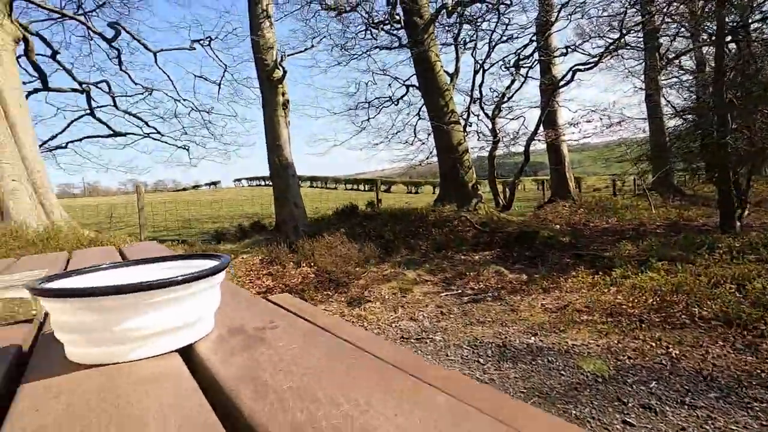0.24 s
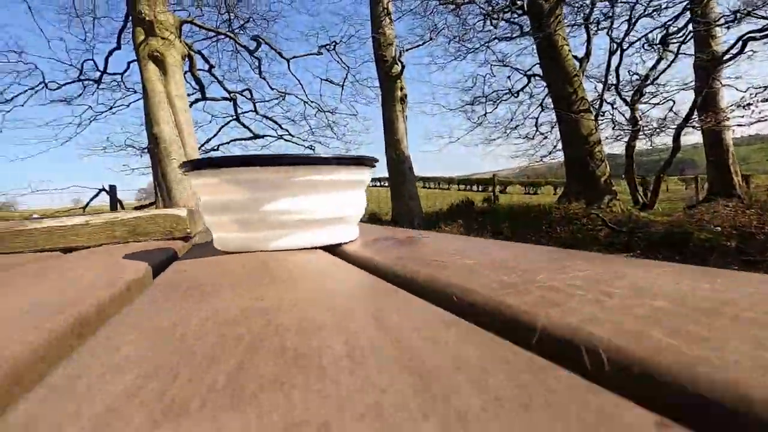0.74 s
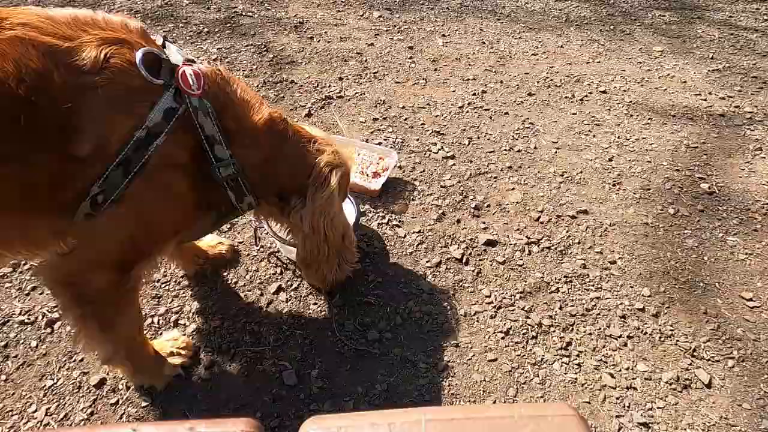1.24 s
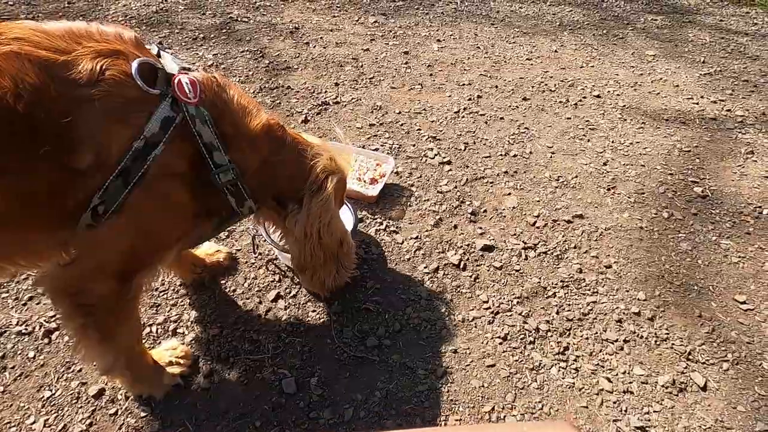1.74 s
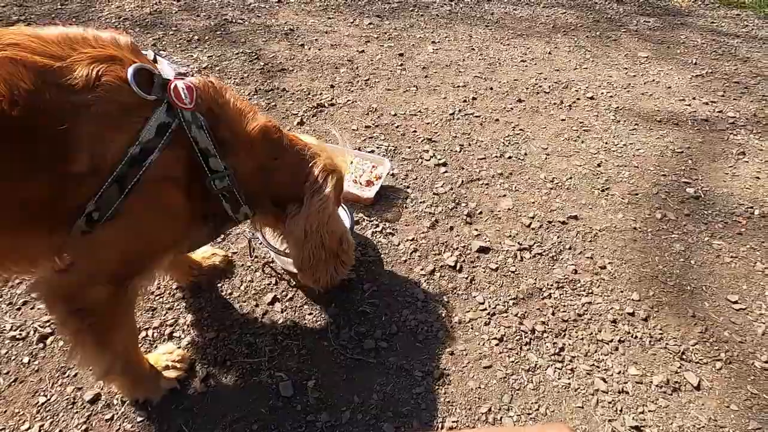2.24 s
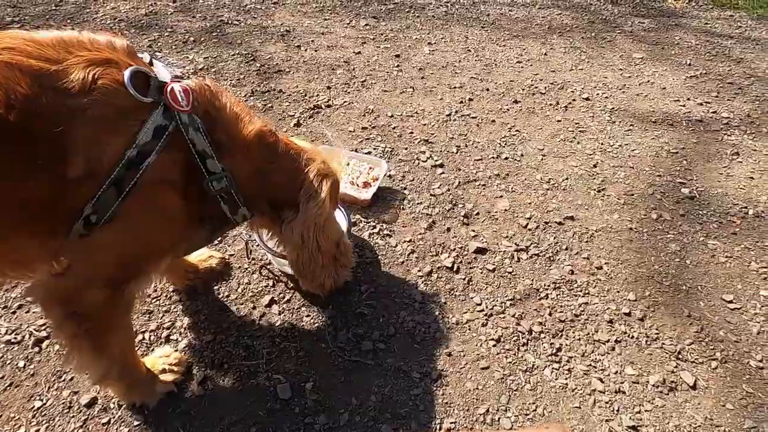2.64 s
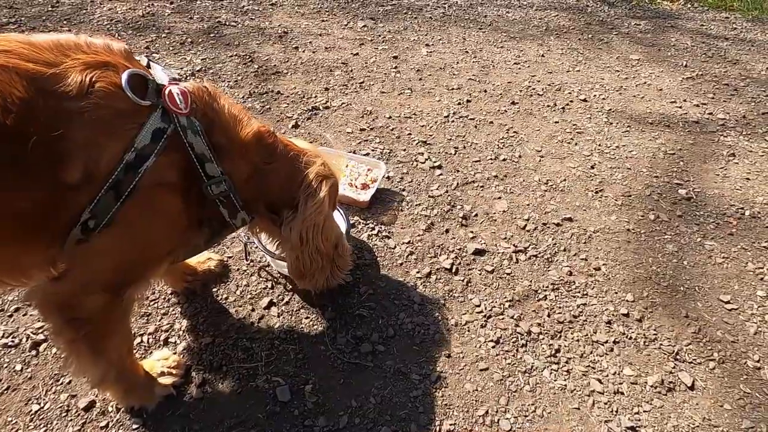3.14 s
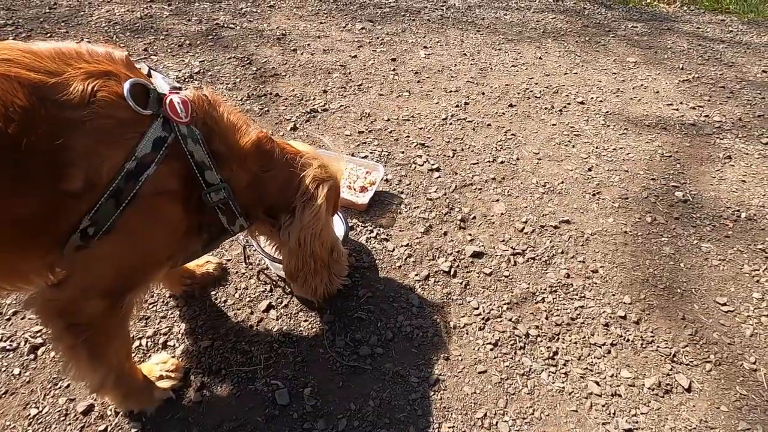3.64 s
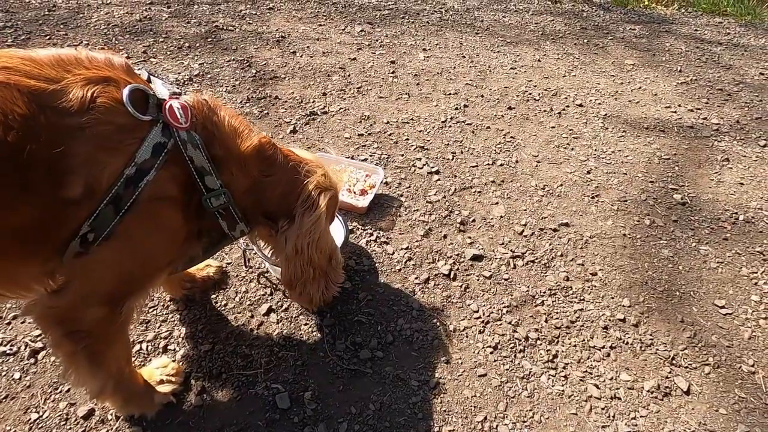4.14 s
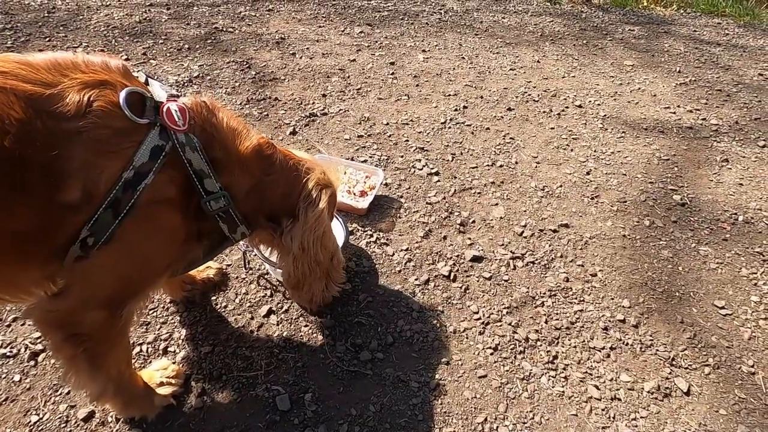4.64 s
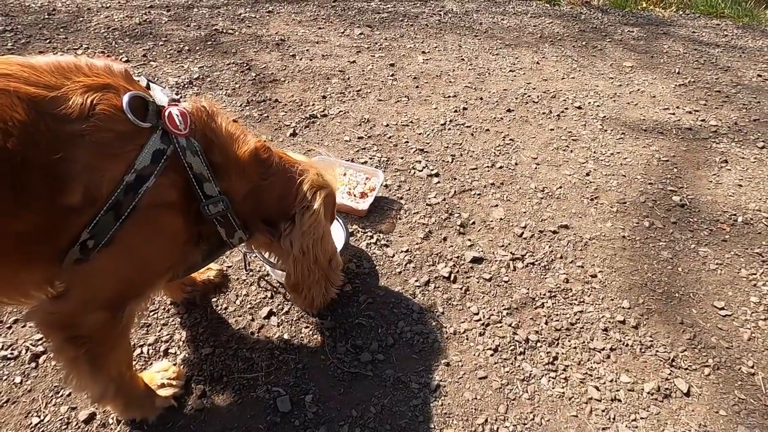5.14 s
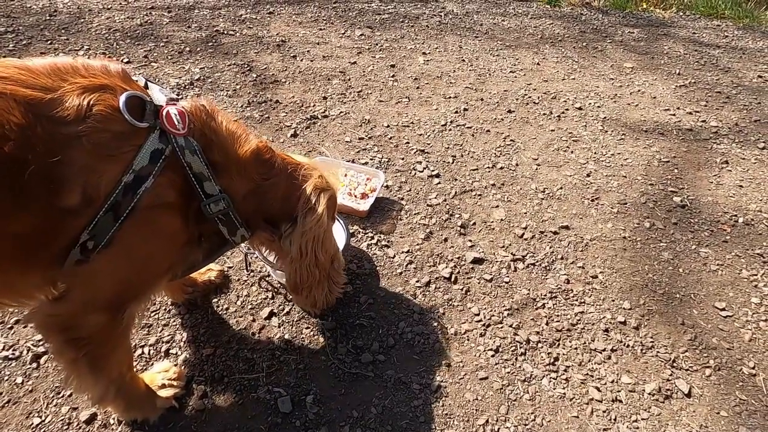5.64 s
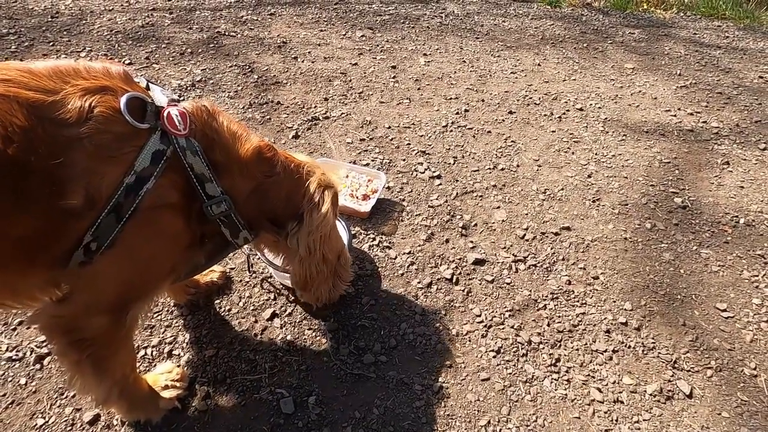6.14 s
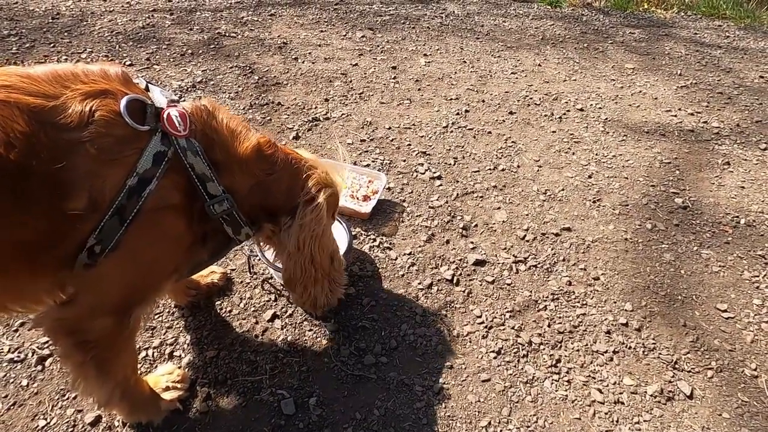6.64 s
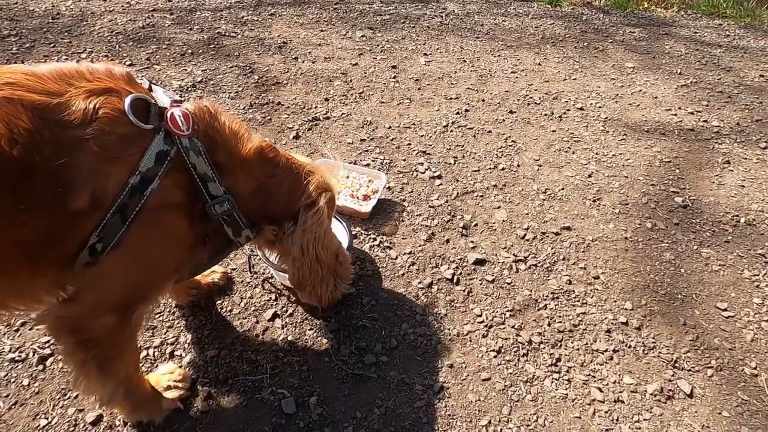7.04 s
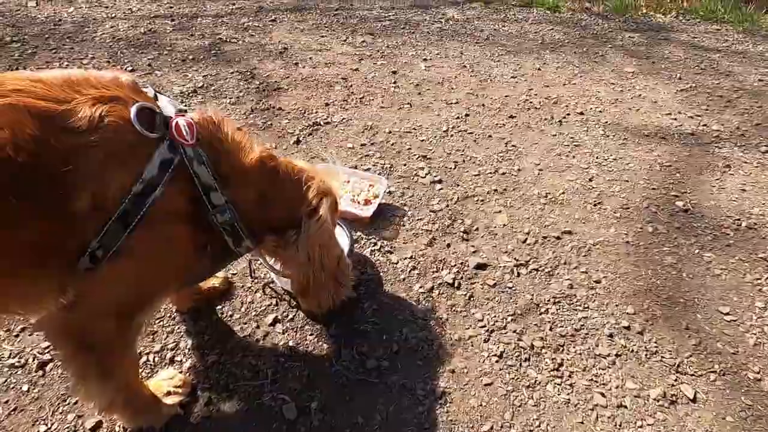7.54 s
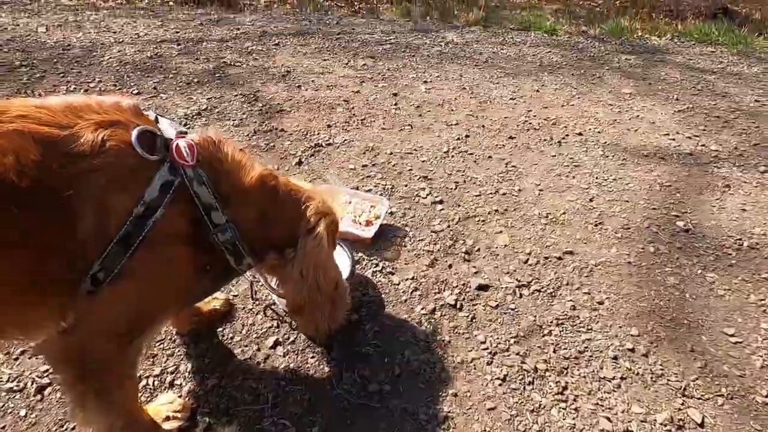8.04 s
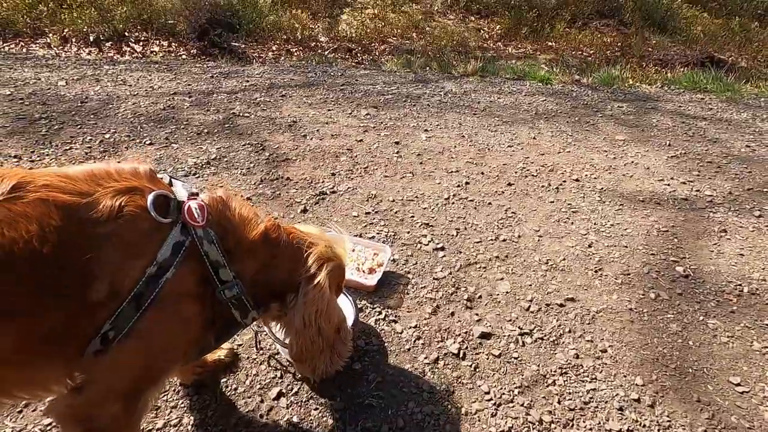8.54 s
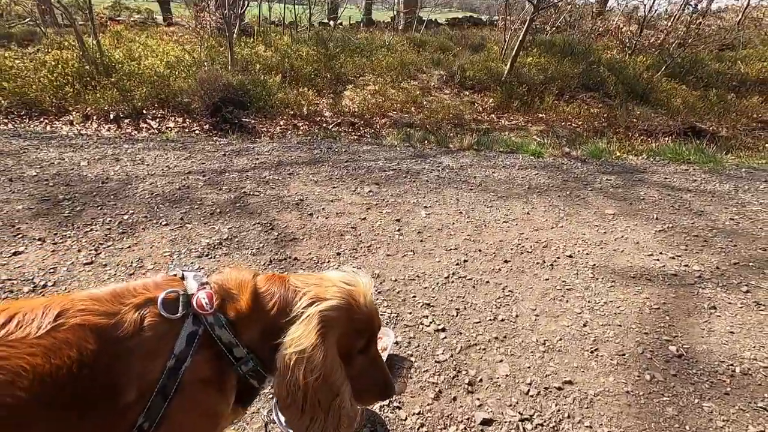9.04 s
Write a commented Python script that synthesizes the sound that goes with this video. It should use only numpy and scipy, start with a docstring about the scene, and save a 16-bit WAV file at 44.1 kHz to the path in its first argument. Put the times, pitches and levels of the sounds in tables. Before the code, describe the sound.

A hand bumps and rubs the microphone, making low thumps that are the loudest sounds, and everything cuts out for a moment. Then a dog laps water from a bowl close by, about three laps a second, with small wet smacks, drips and an occasional low glug. The place is the edge of a wood, with light wind rumbling on the microphone, a faint hiss of leaves and a few very faint high bird calls.

```python
"""A hand bumps and rubs the microphone housing, and the sound drops out for a moment. Then a dog laps
water from a soft folding bowl at the edge of a wood, about three laps a second. Each lap is a few wet
smacks, air pockets ringing as the water film tears, with drips, spray and the odd low glug. Behind it
wind stirs the microphone ports, far leaves hiss and a small bird gives thin high calls.
The image opens from near mono to stereo about halfway through."""
import sys
import numpy as np
from scipy import signal
from scipy.io import wavfile
from scipy.ndimage import uniform_filter1d

SR = 44100
rng = np.random.default_rng(int(sys.argv[2]) if len(sys.argv) > 2 else 0)


def put_to_file(sound):
    """Save the sound as 16-bit audio at rate SR, in the file named by the first command-line argument."""
    columns = np.atleast_2d(sound).T  # one column per channel
    safe = np.clip(columns, -1, 1)
    whole_steps = np.round(safe * 32767)
    wavfile.write(sys.argv[1], SR, whole_steps.astype(np.int16))


N = 409468
CUT_S, BACK_S, FADE_S = 1.342, 1.511, 0.041   # the dropout: silence starts, sound returns, fade-in time
POCKET_LEAD = 882   # samples of run-up before an air pocket peaks

# Wet smacks of tongue on water. Each row: peak time in seconds, low ring in Hz, its level in dB,
# its decay in ms (played as 1.2 at least), high ring in Hz, its level in dB, tearing film in dB.
SMACKS = [(1.575, 1380.0, -40, 4.14, 4800, -41, -59), (1.595, 1870.0, -43.5, 3.2, 3450.0, -42, -49.5),
          (1.617, 777, -51, 7.8, 2230, -51, -62.5), (1.751, 1033, -44, 2, 2650, -51.5, -57.5),
          (1.785, 1645, -48.5, 1, 4730, -61.5, -54.5), (1.804, 1358, -36, 1.9, 2090, -60.5, -66),
          (1.822, 1692, -41.5, 1.2, 4830, -47, -55.5), (1.908, 1563, -40.5, 3.93, 4330, -49.5, -65),
          (2.152, 1305, -39.5, 1.3, 2920.0, -76, -77.5), (2.166, 1490, -45, 3, 2500.0, -61.5, -60.5),
          (2.175, 787, -45.5, 3.8, 2490.0, -49.5, -52.5), (2.187, 855.4, -56.5, 9.5, 3960.0, -60.5, -54),
          (2.31, 853.6, -50.5, 1.3, 2380, -61.5, -53.5), (2.341, 1649, -42.5, 0.95, 3820, -44.5, -55),
          (2.364, 1659, -35, 3.06, 2460, -45.5, -47.5), (2.389, 1525, -48.5, 2.2, 4660, -42, -64.5),
          (2.399, 1490.0, -49, 4.2, 3200, -44.5, -63), (2.476, 1198, -39.5, 3.56, 3850, -39.5, -78),
          (2.501, 934.7, -47.5, 4.9, 3080.0, -51.5, -79.5), (2.67, 1606, -49.5, 1.8, 3500, -51.5, -50.5),
          (2.676, 1641, -47, 1.5, 2410.0, -53.5, -43.5), (2.687, 1570.0, -39.5, 1.1, 3300, -51, -59.5),
          (2.697, 1892, -46, 3.2, 3260, -49, -46.5), (2.746, 1543, -58.5, 1.8, 3930, -48, -44),
          (2.762, 1331, -45, 2.4, 3440, -41, -56.5), (2.778, 777.5, -40, 3.85, 2810, -38, -43),
          (2.798, 2040, -53.5, 1.5, 2200, -51.5, -57), (2.89, 769, -57, 6.2, 4300, -52.5, -54.5),
          (2.955, 1537, -48, 1.95, 2770, -42.5, -55.5), (3.042, 1281, -43, 1.5, 2130, -72.5, -87.5),
          (3.077, 1481, -47.5, 7.5, 3840, -41.5, -45.5), (3.119, 770.7, -48, 5.3, 2260.0, -55.5, -60),
          (3.292, 1590.0, -41, 1.92, 3350, -41.5, -45), (3.305, 1450.0, -61, 3.2, 3800, -45.5, -67),
          (3.395, 988, -46.5, 3.5, 4140, -38, -61), (3.405, 1496, -41, 3.5, 3350, -58.5, -69),
          (3.507, 1937, -51, 2.2, 2350, -49.5, -58.5), (3.555, 1315, -50.5, 2.5, 2730, -51, -58),
          (3.68, 1639, -37.5, 1.25, 4200, -48.5, -60), (3.726, 710, -44, 3.35, 2200, -45, -60.5),
          (3.891, 739.2, -50, 1.8, 2680.0, -46, -54), (3.904, 1540, -49, 1.7, 3150, -56.5, -55),
          (3.917, 1506, -61, 3.3, 3900.0, -43, -61.5), (4.011, 1626, -45.5, 1.9, 2360.0, -57, -68),
          (4.029, 1323, -39.5, 3.5, 2264, -47, -58), (4.179, 1484, -40.5, 2.14, 4895, -49.5, -70),
          (4.276, 1426, -38, 1.4, 3820, -53, -62), (4.286, 1467, -36.5, 0.8, 2760, -63.5, -49.5),
          (4.301, 1538, -55.5, 2.3, 2760, -47, -64), (4.323, 803, -43.5, 1.72, 2750.0, -62.5, -74.5),
          (4.345, 1093, -43, 2.2, 3090.0, -62, -70), (4.44, 1113, -57.5, 2.2, 2430, -48, -61.5),
          (4.5, 1560.0, -42, 4.61, 4010, -40, -64), (4.522, 1800, -53, 1.5, 3730, -39.5, -67.5),
          (4.551, 1095, -54, 1.9, 3970, -49.5, -70), (4.581, 2111, -53.5, 1.5, 2900, -49, -57),
          (4.609, 1560, -51.5, 2.1, 2520, -50, -60), (4.668, 1860.0, -46.5, 1.3, 3020, -42, -74),
          (4.72, 1092, -46, 2.6, 2950, -54, -66.5), (4.74, 1790.0, -48.5, 4.4, 2170, -78.5, -73),
          (4.939, 761, -51, 2.56, 1980, -48, -70), (5.054, 791.3, -41, 3.9, 2480, -43, -57.5),
          (5.075, 1609, -50, 1.4, 2870, -58.5, -74), (5.086, 1495, -45, 2, 2940, -38.5, -39.5),
          (5.104, 1378, -41.5, 1.8, 2680, -63, -73), (5.116, 1359, -43.5, 3.3, 3260, -40.5, -57),
          (5.128, 1670, -49, 1.8, 3450, -41, -46), (5.272, 1541, -40, 2.78, 2000, -66.5, -61.5),
          (5.344, 1154, -48.5, 1.6, 2210.0, -58.5, -77), (5.361, 1570.0, -45.5, 2.4, 4300, -56, -57.5),
          (5.38, 1300.0, -43.5, 3.64, 2450, -52, -60.5), (5.391, 1441, -52, 3.4, 2500, -50.5, -72),
          (5.404, 1550.0, -53.5, 4.9, 2320, -51, -70.5), (5.489, 1546, -42.5, 1, 2610, -29.5, -64.5),
          (5.535, 804, -65, 2.2, 2768, -48, -67), (5.599, 1476, -56.5, 6.9, 2810, -51.5, -66),
          (5.617, 797, -43.5, 6.1, 1988, -45, -64), (5.653, 1166, -43, 2.2, 2900.0, -59.5, -74.5),
          (5.678, 1430.0, -37, 2.52, 5060.0, -58.5, -69.5), (5.712, 1469, -39.5, 1.5, 4040, -48, -62),
          (5.791, 1463, -38.5, 1.3, 3700, -49, -67.5), (5.809, 1234, -37.5, 2.08, 3240.0, -49, -70.5),
          (5.824, 777.6, -38.5, 1.98, 2830, -41.5, -69.5), (5.926, 797, -49.5, 2.3, 2640.0, -55, -69),
          (5.95, 1371, -46.5, 2.8, 3960.0, -53.5, -59.5), (5.981, 1374, -47.5, 3.1, 3280.0, -49.5, -54.5),
          (5.993, 1439, -46.5, 2.6, 2500.0, -58, -63), (6.011, 2055, -43.5, 0.78, 2330.0, -40.5, -69),
          (6.051, 1068, -46, 2.6, 2260, -51, -82), (6.075, 1359, -45.5, 2.7, 3050, -47.5, -66),
          (6.095, 1051, -39, 3.7, 2130, -35.5, -34), (6.139, 1002, -51.5, 2.3, 2970, -47.5, -63),
          (6.259, 800.8, -42, 1.8, 4020, -64.5, -75), (6.281, 1355, -41, 1.15, 4100, -51.5, -57.5),
          (6.318, 1432, -41.5, 2.03, 4020, -37, -63), (6.333, 1560, -69, 9.1, 3270.0, -37.5, -43),
          (6.413, 1261, -44.5, 2.67, 2140.0, -53, -50), (6.52, 1240, -49, 6.4, 2370, -66, -54.5),
          (6.565, 1509, -40.5, 3.35, 3150.0, -54, -53.5), (6.588, 1467, -44.5, 4.3, 2333, -47, -51.5),
          (6.645, 1042, -47, 1.7, 2070, -61.5, -79.5), (6.671, 1083, -51.5, 1.2, 2120, -68.5, -81),
          (6.688, 884.6, -43.5, 6.5, 2060.0, -47, -83), (6.719, 1436, -50, 2, 3040, -47, -56),
          (6.746, 1495, -45, 1.7, 2370, -42.5, -59), (6.757, 1590, -44, 2.04, 2850, -31.5, -44),
          (6.773, 1697, -69, 1.5, 4900, -43, -52.5), (6.786, 2050.0, -48, 2.2, 2323, -48, -53),
          (6.939, 1541, -52, 1.9, 2650, -51.5, -61.5), (6.955, 1545, -48.5, 4.2, 2380.0, -42.5, -64.5),
          (6.968, 1241, -50.5, 3.4, 3410.0, -45.5, -71), (6.978, 1580.0, -53.5, 2.0, 2450, -43.5, -48),
          (7.054, 1457, -68.5, 2.3, 4950, -45.5, -56.5), (7.116, 1920.0, -45, 4.6, 2280, -46, -55.5),
          (7.191, 1142, -53.5, 2.7, 2723, -58, -54), (7.257, 1282, -37.5, 2.88, 3000, -37.5, -48),
          (7.262, 1386, -38.5, 3.94, 2300, -41, -49), (7.273, 1380, -51.5, 2.3, 3000, -52, -53.5),
          (7.322, 1555, -40.5, 1.84, 3000, -54, -60), (7.333, 1503, -29.5, 0.913, 5000.0, -44.5, -52),
          (7.47, 1546, -53, 2.9, 2400.0, -46, -56), (7.525, 2066, -54, 2.3, 2363, -45.5, -56.5),
          (7.535, 1424, -51, 1.94, 2340, -46.5, -64.5), (7.551, 1537, -50.5, 3.2, 2400, -43, -47),
          (7.632, 1452, -36.5, 2.27, 2420, -40, -58.5), (7.665, 1288, -47.5, 1.3, 2100, -53.5, -60),
          (7.748, 1011, -44, 2.67, 2526, -60, -60.5), (7.814, 1525, -42, 3.2, 2360, -56.5, -69),
          (7.861, 1307, -48.5, 1.4, 2430.0, -57, -83.5), (7.876, 1292, -55, 2.2, 2330, -50.5, -60),
          (7.917, 1194, -41.5, 6.8, 2180, -51, -68), (7.979, 796.7, -56.5, 5.45, 3220, -59, -77),
          (8.124, 1278, -53.5, 2.1, 2400, -48.5, -65), (8.14, 1386, -51.5, 6.4, 2360, -44, -56),
          (8.1611, 1476, -48, 2, 2450, -37, -66.5), (8.1665, 1265, -59, 1.9, 3890, -36.5, -59.5),
          (8.245, 1565, -49, 1.4, 2420, -51.5, -64), (8.279, 1233, -62, 8.8, 2334, -45, -54.5),
          (8.314, 1448, -49, 7.7, 2230, -41.5, -55), (8.333, 1177, -47.5, 3.5, 2780, -35, -53),
          (8.4, 1316, -48.5, 2.9, 4260, -50, -44), (8.424, 1386, -52, 2.2, 2470, -47.5, -46),
          (8.456, 2300, -53, 2, 4420, -53.5, -65.5), (8.534, 1369, -48.5, 1.74, 4440, -50, -61.5),
          (8.566, 1610.0, -23, 2.19, 2430, -34, -39.5), (8.598, 1870, -42, 1.24, 3150, -37.5, -74),
          (8.695, 1171, -37, 5.77, 2380, -41.5, -49), (8.73, 815, -47, 6.05, 4170, -46.5, -58.5),
          (8.765, 1499, -53.5, 4.1, 2795, -50, -78.5), (8.886, 1239, -52.5, 1.7, 2190.0, -53.5, -51.5),
          (9.031, 1030.0, -71, 2.2, 4790.0, -45.5, -59.5), (9.055, 2088, -57, 1.7, 2120, -52.5, -63),
          (9.089, 902, -47, 2.6, 3720, -59.5, -57), (9.104, 1153, -57, 4.5, 2200.0, -52, -50)]
def smacks():
    """Two air pockets ring in each smack while the water film tears."""
    out = np.zeros(N)
    for s, low_hz, low_db, low_ms, high_hz, high_db, film_db in SMACKS:
        low, _ = pocket(low_hz, low_ms / 1000, rough=0.36)
        high, envelope = pocket(high_hz, ring_s(high_hz), rough=0.3)
        smack = from_db(low_db) * low + from_db(high_db) * high + from_db(film_db) * tear(envelope)
        add(out, s - POCKET_LEAD / SR, smack)
    return out


def pocket(hz, decay_s, rough):
    """An air pocket pops open and dies in milliseconds, pitch sliding; gives sound and envelope."""
    t = np.arange(-POCKET_LEAD, 1323) / SR
    decay_s = np.clip(decay_s, .0012, .02)
    rise_s = .0004 + .27 * decay_s
    envelope = np.where(t < 0, np.exp(-(t / rise_s) ** 2), np.exp(-np.abs(t / decay_s) ** 1.15))
    slide = rng.normal(.01, .035) * np.clip(t / decay_s, -1, 3)
    tone = np.sin(2 * np.pi * (np.cumsum(hz * (1 + slide)) / SR + rng.random()))
    churn = noise(hz / 1.405, hz * 1.267, len(t))
    # a ragged squelch leads up to the peak and trails after it
    ragged = rms_one(uniform_filter1d(rng.standard_normal(len(t)), size=130)) ** 2
    skirt = np.where(t < 0, 0.8 * np.exp(t / 0.007), np.exp(-t / 0.012))
    squelch = from_db(-20) * np.minimum(ragged, 2.5) * skirt
    return envelope * (tone + rough * churn) + squelch * churn, envelope + squelch / 2


def ring_s(hz):
    """A pocket rings for a moment plus a few cycles, so low ones last longer."""
    return 0.0006 + 3.2 / hz


def tear(envelope):
    """The water film tears: a bright spit of noise, its colour new each time."""
    hz = rng.uniform(3669, 7212)
    white = rng.standard_normal(len(envelope))
    return envelope * rms_one(band(white, hz / 1.06, hz * 1.07) + from_db(-11) * band(white, 2650, 6860))


# Laps of the tongue. Each row: start in seconds, length in seconds, splash level in dB.
LAPS = [(1.549, 0.074, -56.5), (1.73, 0.159, -55.5), (1.984, 0.1935, -58), (2.293, 0.189, -59),
        (2.627, 0.168, -61), (2.881, 0.2177, -60), (3.211, 0.2345, -60), (3.483, 0.24, -61),
        (3.831, 0.1936, -61.5), (4.084, 0.312, -58.5), (4.419, 0.192, -54.5), (4.667, 0.2998, -58),
        (5.007, 0.1211, -55), (5.191, 0.2456, -56.5), (5.456, 0.1223, -56), (5.593, 0.1726, -57.5),
        (5.761, 0.247, -58), (6.043, 0.1176, -60), (6.23, 0.216, -61), (6.504, 0.27, -61.5),
        (6.912, 0.082, -62), (7.037, 0.313, -61.5), (7.436, 0.246, -60.5), (7.734, 0.238, -59),
        (8.048, 0.1415, -58), (8.236, 0.258, -61), (8.679, 0.184, -60.5), (8.877, 0.0517, -58.5),
        (9.026, 0.143, -61.5)]
def splash():
    """Envelope of the stirred water: each lap swells, holds and settles to a faint stir."""
    rise_s, fall_s, still_db = 0.0438, 0.04, -69
    t, out = np.arange(N) / SR, np.full(N, from_db(still_db))
    for s, length_s, level_db in LAPS:
        i, j = round((s - .1) * SR), round((s + length_s + .3) * SR)
        swell = np.minimum((t[i:j] - s) / rise_s, 0)
        settle = np.minimum((s + length_s - t[i:j]) / fall_s, 0)
        out[i:j] = np.maximum(out[i:j], from_db(level_db) * np.exp(swell + settle))
    return out * (t > CUT_S)


def drips(stirred):
    """Drips scatter through each lap: one lingering pocket each, with a trace of tearing film."""
    per_s, low_hz, high_hz = 30, 937.3, 5000
    out = np.zeros(N)
    for start, length_s, _ in LAPS:
        draws = rng.random((12, 4))
        falls = draws[:, 3] < per_s * length_s / len(draws)
        for place, pitch, size, _ in draws[falls]:
            s, hz = start + place * length_s, low_hz * (high_hz / low_hz) ** pitch
            ring, envelope = pocket(hz, 1.23 * ring_s(hz), rough=0.7)
            gain = stirred[round(s * SR)] * from_db(-3 + 7 * size)
            add(out, s - POCKET_LEAD / SR, gain * (ring + from_db(-8) * tear(envelope)))
    return out


# Gliding gurgles and a couple of short high plinks. Each row: start in seconds, length in seconds,
# first pitch in Hz, last pitch in Hz, level in dB.
GURGLES_AND_PLINKS = [(1.651, 0.01, 2550, 2450, -57), (1.996, 0.029, 2690, 2200, -62.5),
                      (3.626, 0.03, 1258, 1344, -58), (4.759, 0.0346, 1158, 1556, -57),
                      (6.082, 0.0157, 966.7, 1115, -43), (7.904, .025, 1204, 984, -53.5),
                      (8.099, 0.0315, 770, 1490, -58.5), (8.3, 0.0438, 1032, 1211, -57.5),
                      (8.375, 0.052, 1591, 1263, -54.5)]
def gurgles_and_plinks():
    """Short watery rings that glide in pitch and flutter in level."""
    out = np.zeros(N)
    for s, length_s, from_hz, to_hz, level_db in GURGLES_AND_PLINKS:
        size = round(length_s * SR)
        flutter = 1 + 0.61 * noise(40, 220, 4410)[-size:]
        tone = np.sin(2 * np.pi * np.cumsum(np.geomspace(from_hz, to_hz, size)) / SR)
        add(out, s, from_db(level_db) * np.hanning(size) ** 0.53 * flutter * tone)
    return out


# Tone colour of the spray. Each row: drop pitch in Hz, relative level in dB.
DROPS = [(240, -39), (400, 4.5), (598, -19.5), (781, -1.5), (1080, -4), (1600, 1), (2020, -10), (2730, -11),
         (4730, -13.5), (14000, -26.5)]
def spray(smacking, stirred):
    """Small drops fly up and fall back over a soft wash, strongest around the smacks."""
    smack_envelope = uniform_filter1d(uniform_filter1d(np.abs(smacking), size=1100), size=1100)
    agitation = rms_one(np.sqrt(smack_envelope + 1e-9))
    drops = rms_one(sum(grains(per_s=2600, cycles=14, spread_db=4, spectrum=DROPS)))
    wash = from_db(-17 + 8.65 * drift(30)) * noise(800, 4300)
    return stirred * (0.523 + 0.235 * agitation) * (from_db(-3.5) * drops + wash)


# Resonances of the bowl. Each row: centre in Hz, width in Hz, relative level in dB.
BOWL = [(763, 67.2, 8), (1590, 110, -2.5), (2640, 410, 2), (4377, 370, 3.5)]
def bowl(x, wet_db):
    """The air over the water rings along and gives the lapping a hollow colour."""
    out = x.copy()
    for hz, width_hz, level_db in BOWL:
        r = np.exp(-np.pi * width_hz / SR)
        ring = signal.lfilter([1 - r, 0, r - 1], [1, -2 * r * np.cos(2 * np.pi * hz / SR), r * r], x)
        out += from_db(wet_db + level_db) * ring
    return out


# Low glugs. Each row: start in seconds, peak level in dB, pitch in Hz.
GLUGS = [(1.607, -46, 439), (2.138, -48, 187.4), (2.419, -41.5, 173.4), (3.026, -44.5, 174.5),
         (3.258, -47, 382.6), (4.816, -45, 155.6), (4.98, -49.5, 280.5), (5.023, -51, 172.5),
         (5.161, -52, 362), (5.613, -43.5, 370.5), (5.677, -44.5, 264), (6.035, -46, 165.6),
         (6.279, -49, 399), (6.639, -48, 198.1), (7.225, -47.5, 184), (7.849, -42.5, 205.9),
         (8.062, -50.5, 196.3), (8.857, -43, 199.5), (9.183, -43, 176.8)]
def glugs():
    """Water slops and is swallowed: short round notes that bend slightly up."""
    notes = [(s, peak_db, hz, 0.0214 + 7.53 / hz) for s, peak_db, hz in GLUGS]
    return thuds(notes, rise_s=0.000965, glide=0.036)


# Soft sloshes. Each row: start in seconds, length in seconds, level in dB.
SLOSHES = [(4.821, 0.241, -63.5), (5.437, 0.256, -64.5), (8.854, 0.2062, -69)]
def sloshes():
    """Water washes against the bowl: lumpy low noise that swells, holds and fades."""
    t, envelope, edge_s = np.arange(N) / SR, np.zeros(N), 0.0111
    for s, length_s, level_db in SLOSHES:
        envelope += from_db(level_db) * np.clip(np.minimum(t - s, s + length_s - t) / edge_s + 1, 0, 1)
    return envelope * from_db(4.6 * drift(30)) * noise(159, 642)


# Bright flecks of spray. Each row: start in seconds, level in dB.
FLECKS = [(2.3092, -70), (2.3408, -67), (3.2614, -56), (3.3915, -66), (3.8239, -58), (4.5009, -56),
          (5.3327, -65.5), (6.0932, -57), (6.895, -63.5), (7.522, -56.5), (7.7948, -62.5), (8.797, -67)]
def flecks(stirred):
    """Spray clears the rim: tiny bright ticks over a fine mist that follows the splash."""
    out = from_db(-36.5 + 8.3 * np.tanh(drift(30))) * stirred * noise(5100, 12000)
    for s, level_db in FLECKS:
        add(out, s, from_db(level_db) * tick(5160, 8990, size=500, t60=0.0385))
    return out


# Low thumps on the microphone: hand bumps early, a wind buffet later.
# Each row: start in seconds, thump in dB, its pitch in Hz, shell ring in dB.
THUMPS = [(0.004, -37.5, 32.24, -58), (0.015, -15, 46.3, -29), (0.038, -17.5, 65.3, -49.5),
          (0.116, -26, 54.4, -53.5), (0.296, -24, 99.9, -63.5), (0.321, -25.5, 38, -55.5),
          (0.387, -29.5, 123, -69.5), (0.405, -29.5, 108.3, -71.5), (0.43, -27, 53.3, -47.5),
          (0.451, -23.5, 86, -58), (0.562, -34, 72.7, -70.5), (0.608, -30, 63.1, -59.5),
          (1.007, -43.5, 238, -61.5), (1.024, -19.5, 177.8, -24), (1.042, -25.5, 92.7, -35),
          (1.105, -30.5, 33, -42.5), (1.125, -27, 128.5, -33.5), (1.209, -42.5, 118, -50),
          (1.25, -37, 97, -63), (1.311, -36.5, 44, -88), (3.149, -41.5, 65.4, -93), (6.51, -42, 55.08, -82)]
# Modes of the housing shell. Each row: pitch in Hz, relative level in dB, 60 dB decay in seconds.
SHELL = [(267.2, 0.5, 0.0466), (616, -12.5, 0.015)]
def thumps():
    """A push of hand or wind makes a low thump that sags in pitch, and the shell rings briefly."""
    pushes = [(s, thump_db, hz, 0.021 + 2.2 / hz) for s, thump_db, hz, _ in THUMPS]
    out = thuds(pushes, rise_s=.005, glide=-.3)
    for hz, mode_db, t60 in SHELL:
        rings = [(s, shell_db + mode_db, hz, t60) for s, *_, shell_db in THUMPS]
        out += thuds(rings, rise_s=0.002, glide=-0.14)
    return out


# Fingers rubbing. Each row: time in seconds, level in dB, treble against the lows in dB.
RUB = [(0.06, -88, -4), (0.52, -90, -10), (0.535, -64, -18), (0.638, -58, -20), (0.655, -70, -15),
       (0.84, -83, -24), (1.0, -74.5, -6.5), (1.046, -62, -6.5), (1.15, -67.5, -6.5), (1.33, -92, 2)]
# A fingertip catching. Each row: peak time in seconds, pitch in Hz, level in dB, decay in ms.
SLIPS = [(.536, 1350, -47, 1.5), (.568, 1400, -50, 2), (.577, 1350, -46, 3), (.589, 1500, -43, 2),
         (.597, 750, -48, 4), (.616, 900, -47, 7), (.636, 760, -42, 5)]
# Plastic ticks. Each row: start in seconds, level in dB.
TICKS = [(0.0977, -62), (1.026, -50), (1.143, -59), (1.2143, -60.5)]
def fingers():
    """Skin sticks and slips on the housing, and the plastic ticks in the grip."""
    level_db, bright_db = in_time(RUB + [(1.35, -200, 0)])
    size = round(BACK_S * SR)
    skin_colour = [(450, 14), (1300, 6.5), (2500, -4.5), (7000, -27.5), (12000, -45)]   # Hz, dB
    low, high = grains(per_s=5000, cycles=5, spread_db=3, spectrum=skin_colour, size=size)
    out = from_db(level_db)
    out[:size] *= rms_one(low) + from_db(bright_db[:size]) * rms_one(high)
    for s, hz, slip_db, decay_ms in SLIPS:
        squeak, _ = pocket(hz, decay_ms / 1000, rough=0.44)   # the same short, rough chirp as a pop
        add(out, s - POCKET_LEAD / SR, from_db(slip_db) * squeak)
    for s, tick_db in TICKS:
        add(out, s, from_db(tick_db) * tick(660, 5800, size=400, t60=0.047))
    return out


# The ride of the rumble, in three stretches. Each row: time in seconds, level in dB,
# upper band against the lower in dB.
RUMBLE = [
    [(0.03, -27, 2), (0.075, -42, -11), (0.2, -48.5, -17.5), (0.28, -48.5, -11), (0.36, -49, -5.5),
     (0.62, -46.5, -7), (0.7, -58.5, -7.5), (0.9, -70, -13)],
    [(0.93, -65, -32.5), (1.014, -49.5, 0), (1.33, -41, -26)],
    [(1.52, -57, -1.5), (1.65, -45.5, -18.5), (2.0, -52.5, -14.5), (3.05, -58, -9.5), (3.17, -55, -11),
     (5.43, -59, -4), (5.78, -51.5, -15), (6.3, -61.5, -3), (6.9, -50, -19), (7.2, -60.5, -4.5),
     (8.6, -52, -16), (8.91, -59, 0), (9.28, -57, -7.5)],
]
def rumble():
    """Wind on the ports and the grip on the housing make two bands of lumpy low noise."""
    level_db, upper_db = in_time(np.vstack(RUMBLE))
    low = noise(21.96, 62.53) * from_db(6.68 * np.tanh(drift(6.03)))
    upper = noise(41, 221.5, order=4) * from_db(upper_db + 6.95 * np.tanh(drift(9.87)))
    return from_db(level_db) * (low + upper)


# Thin bird calls. Each row: start in seconds, end in seconds, pitch in Hz, level in dB.
BIRD_CALLS = [(0.949, 1.08, 7866, -70), (1.151, 1.266, 8250, -76.5), (1.73, 1.859, 7790, -72.5),
              (2.337, 2.446, 7790, -75), (4.488, 4.618, 7990, -77), (6.79, 6.965, 7780, -80.5)]
def bird():
    """A small bird whistles near-pure notes that waver slightly."""
    out, waver = np.zeros(N), 1 + 0.0027 * drift(40)
    for start, end, hz, level_db in BIRD_CALLS:
        i, j = round(start * SR), round(end * SR)
        whistle = np.sin(2 * np.pi * hz / SR * np.cumsum(waver[i:j]))
        out[i:j] += from_db(level_db) * np.hanning(j - i) ** 0.53 * whistle
    return out


# Tone colour of the outdoor bed. Each row: frequency in Hz, relative level per Hz in dB.
AIR = [(88, -30), (150, 1), (568, -2.5), (774, -17), (1120, 3), (1520, -17.5), (2070, -2.5), (2560, -14),
       (3490, -20.5), (4840, -16.5), (6590, -11.5), (11100, -60), (15100, -78)]
def open_air(flicker_db):
    """Far leaves and open country: half-octave bands of noise that flicker a little."""
    edges_hz = 130 * 2 ** np.arange(0, 7.1, .5)
    out, white = np.zeros(N), rng.standard_normal((2, N))
    for k, (low, high) in enumerate(zip(edges_hz, edges_hz[1:])):
        level_db = at_hz(AIR, np.sqrt(low * high)) + flicker_db * drift(26)
        out += from_db(level_db) * band(white[k % 2], low, high)
    return from_db(-71.5) * rms_one(out)


# The fader ride on the bed. Each row: time in seconds, gain in dB.
BED_RIDE = [(0, 0), (.62, -2.5), (.72, -7.5), (.93, -8), (1.05, 10.5), (1.34, -3)]
def bed(leaves):
    """Leaves and microphone hiss dip together, swell just before the dropout, then settle."""
    ride_db, = in_time(BED_RIDE)
    hiss = from_db(-100) * band(rng.standard_normal(N), 7200, 15000)
    return from_db(ride_db) * (leaves + hiss)


# The image opening from near mono to stereo. Each row: time in seconds, side gain in dB.
WIDTH = [(0, -43.5), (3.8, -43.5), (3.95, -26), (5.2, -10.5), (9.28, -7)]
def stereo_side(mid, leaves, wind):
    """What two close ports do not share: pressure slope, late scatter, their own air and wind."""
    side_db, = in_time(WIDTH)
    gradient = np.gradient(uniform_filter1d(mid, size=5))
    slope = -from_db(8.5) * gradient + from_db(-12.5) * band(mid, 1600, 3500)   # dog nearer the right
    scatter = from_db(-12) * np.roll(band(mid, 660, 5700), shift=310)
    # shifted by seconds, air and wind are unrelated to the middle
    own_air = from_db(7.5) * band(np.roll(leaves, shift=N // 2), 100, 7000)
    own_wind = from_db(-7) * np.roll(wind, shift=N // 3)
    return from_db(side_db) * (slope + scatter + own_air + own_wind)


def grains(per_s, cycles, spread_db, spectrum, size=N):
    """A bunched cloud of tiny soft-edged rings; gives the parts below and above 2500 Hz."""
    strengths = from_db(spread_db * np.minimum(rng.exponential(1, size), 4)) * rng.choice([-1, 1], size)
    born = rng.random(size) < per_s * from_db(4.5 * drift(40)[:size]) / SR
    pitch_index, low, high = rng.integers(0, 26, size), 0, 0
    for k, hz in enumerate(np.geomspace(450, 12000, 26)):
        r, w = from_db(-60 * hz / cycles / SR), 2 * np.pi * hz / SR
        resonator = [0.995, 0.0092, -1.277, 1, -2 * r * np.cos(w), r * r]
        kicks = strengths * born * (pitch_index == k) + 1e-18
        ring = rms_one(signal.sosfilt([resonator] * 2, kicks))   # two passes soften the attack
        ring *= np.sqrt(hz) * from_db(at_hz(spectrum, hz))
        low, high = (low + ring, high) if hz < 2500 else (low, high + ring)
    return low, high


def thuds(events, rise_s, glide):
    """Dull low rings that swell for a moment, then die, their pitch gliding."""
    out = np.zeros(N)
    for s, peak_db, hz, t60 in events:
        t = np.arange(int(t60 * SR)) / SR
        envelope = (1 - np.exp(-t / rise_s)) ** 2 * from_db(-60 * t / t60)
        tone = np.sin(2 * np.pi * hz * t * (1 + glide * t / t60))
        add(out, s, from_db(peak_db) * envelope / envelope.max() * tone)
    return out


def tick(low_hz, high_hz, size, t60):
    """A snap of decaying noise, size samples long."""
    return noise(low_hz, high_hz, size) * from_db(-60 * np.arange(size) / SR / t60)


def noise(low_hz, high_hz, size=N, order=2):
    """A band of noise at unit power."""
    return rms_one(band(rng.standard_normal(size), low_hz, high_hz, order))


def drift(rate_hz):
    """Slow random wander with spread 1."""
    r = np.exp(-80 * np.pi * rate_hz / SR)
    slow = signal.lfilter([1], [1, -2 * r, r * r], rng.standard_normal(N // 40 + 2002))[2000:]
    return np.interp(np.arange(N) / 40, np.arange(len(slow)), rms_one(slow))


def band(x, low_hz, high_hz, order=2):
    """Butterworth band-pass."""
    return signal.sosfilt(signal.butter(order, [low_hz, high_hz], "band", fs=SR, output="sos"), x)


def in_time(rows):
    """Turn timed rows into one curve per column, a value per sample."""
    s, *columns = np.transpose(rows)
    return [np.interp(np.arange(N) / SR, s, column) for column in columns]


def at_hz(points, hz):
    """Read a spectrum on a log-frequency axis."""
    points_hz, points_db = np.transpose(points)
    return np.interp(np.log(hz), np.log(points_hz), points_db)


def add(out, s, x):
    """Mix x into out at s seconds."""
    i = max(round(s * SR), 0)
    out[i:i + len(x)] += x[:len(out) - i]


def from_db(db):
    """Decibels to gain."""
    return 10 ** (np.asarray(db) / 20)


def rms_one(x):
    """Scale to unit power."""
    return x / np.sqrt(np.mean(x ** 2) + 1e-20)


def scene():
    """Mix dog, hand, wind and wood in the middle, then widen with the side signal."""
    stirred = splash()
    smacking = smacks() + drips(stirred) + gurgles_and_plinks()
    lapping = smacking + spray(smacking, stirred)
    softened = band(lapping, 220, 6700, order=3)   # roll off the deep bass and the top treble
    water = bowl(softened, wet_db=-13.5) + glugs()
    leaves = open_air(flicker_db=4)
    mid = water + sloshes() + flecks(stirred) + bed(leaves) + bird() + fingers()
    wind = rumble()
    return mid + wind + thumps() + stereo_side(mid, leaves, wind) * [[1], [-1]]


def record(dry):
    """The sound stops dead for a moment and fades back in; a steep low-pass takes off the very top."""
    t = np.arange(N) / SR
    gate = np.where(t < CUT_S, 1, np.clip((t - BACK_S) / FADE_S, 0, 1))
    return signal.sosfilt(signal.cheby2(12, 70, 16200, fs=SR, output="sos"), dry * gate)


dry = scene()
out = record(dry)
put_to_file(out)
```